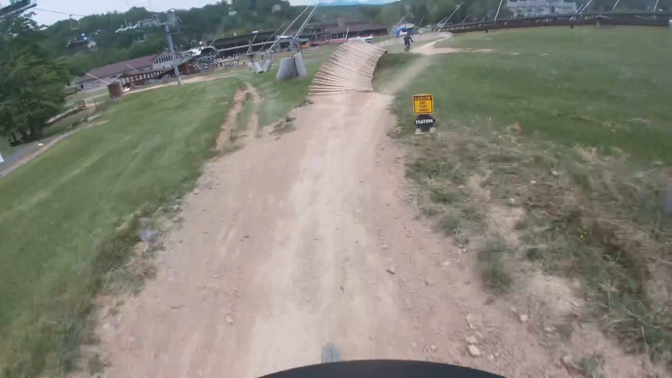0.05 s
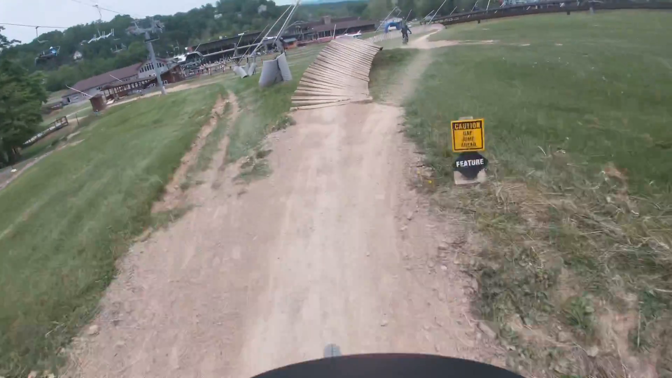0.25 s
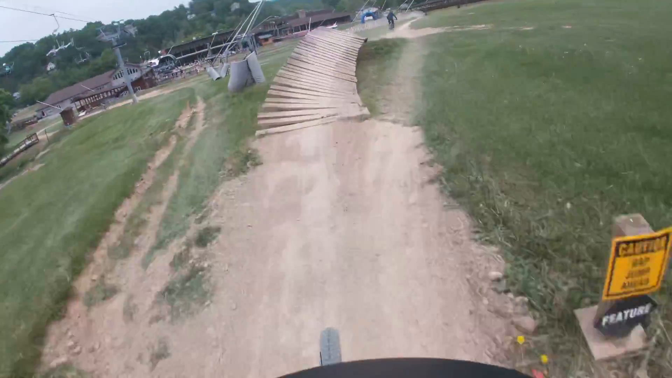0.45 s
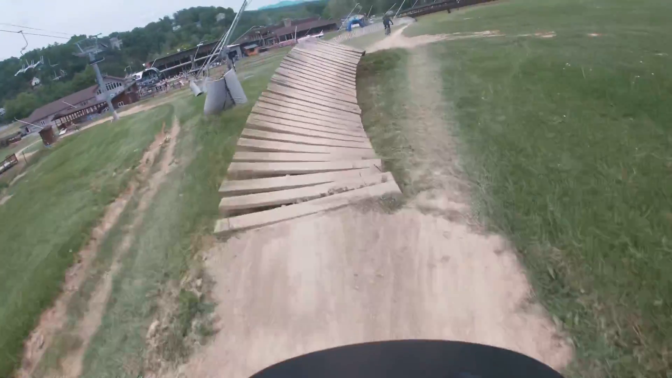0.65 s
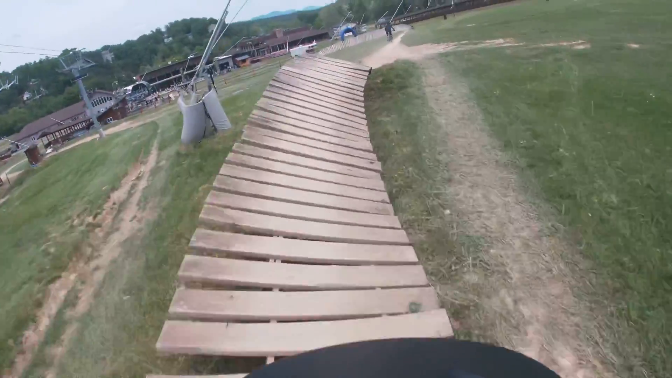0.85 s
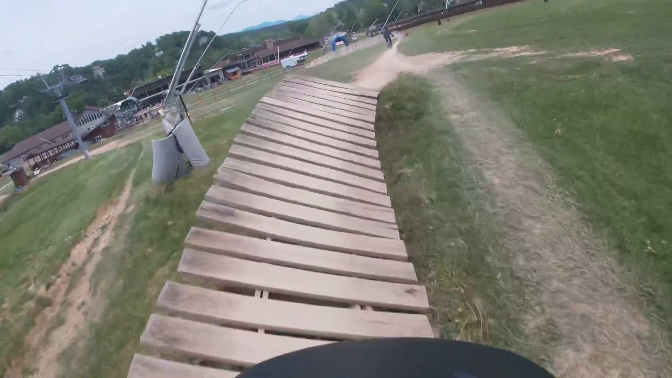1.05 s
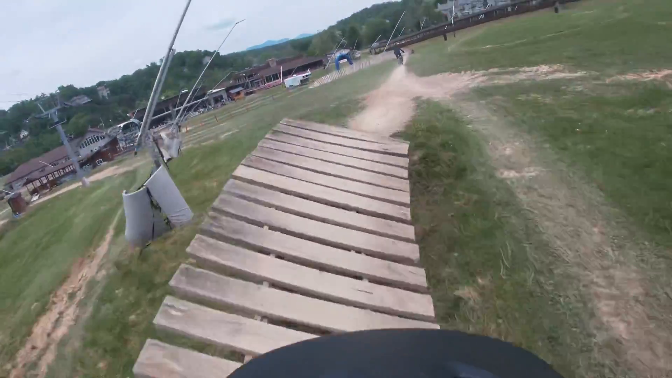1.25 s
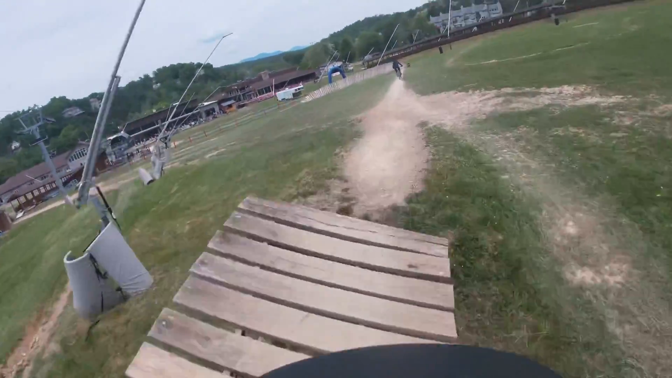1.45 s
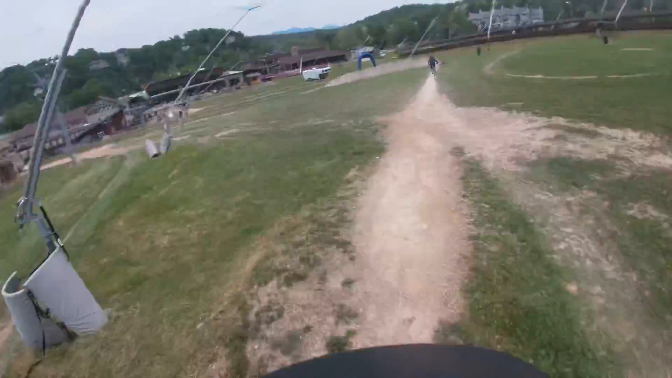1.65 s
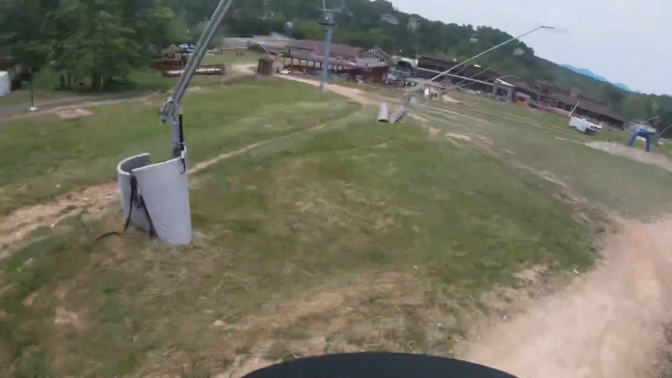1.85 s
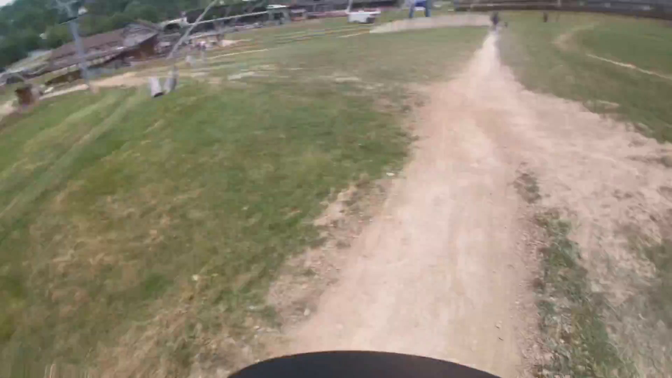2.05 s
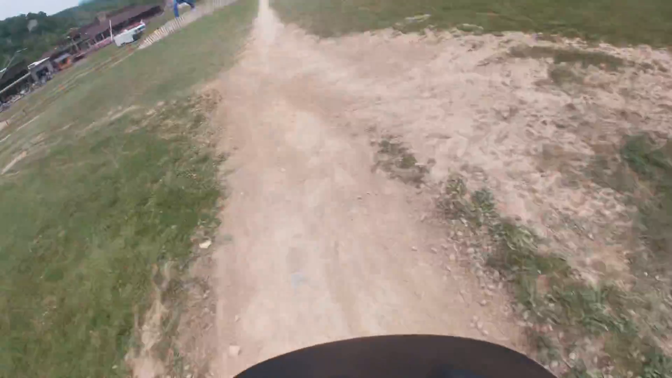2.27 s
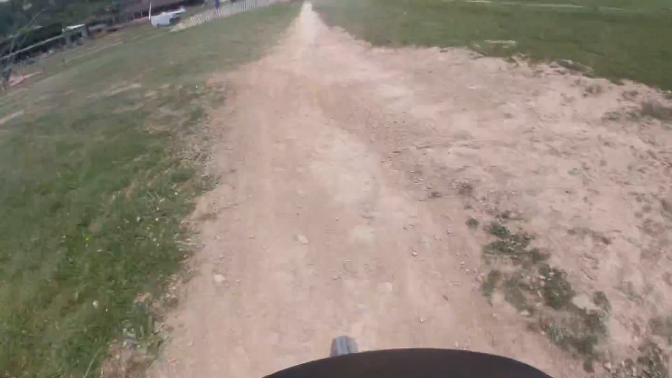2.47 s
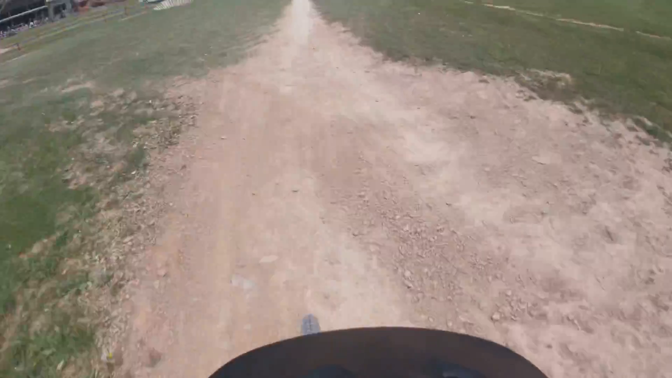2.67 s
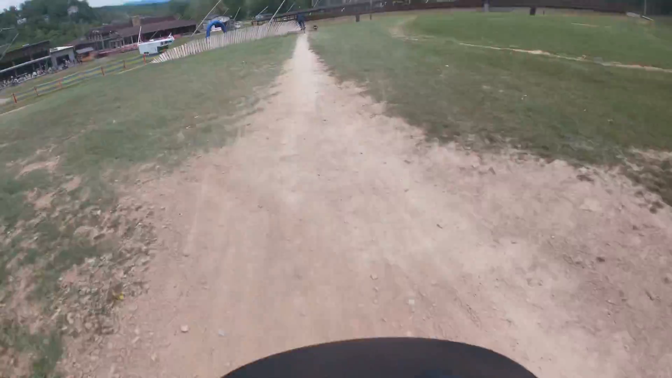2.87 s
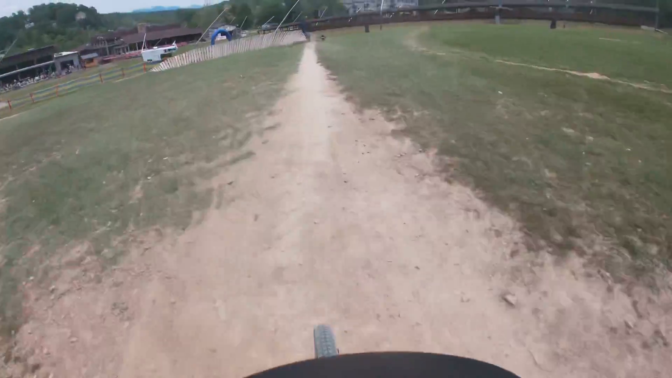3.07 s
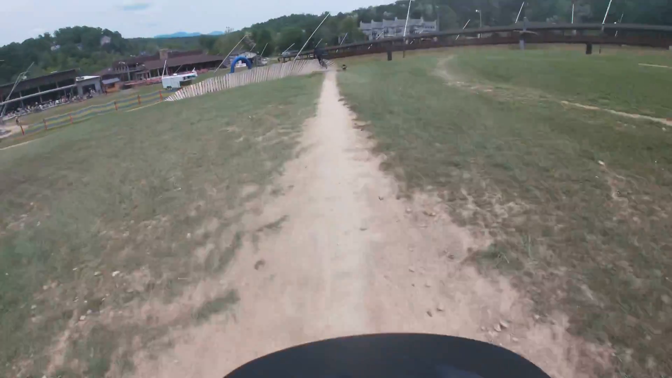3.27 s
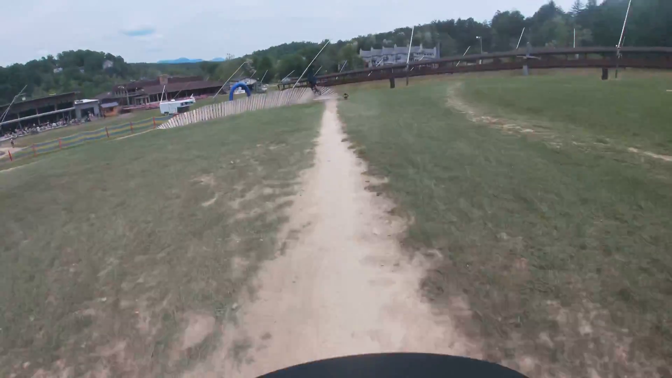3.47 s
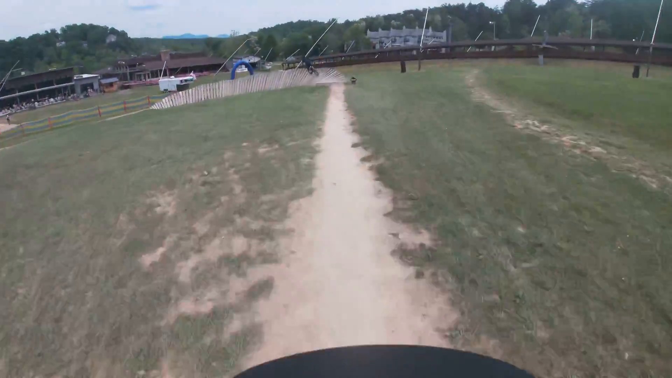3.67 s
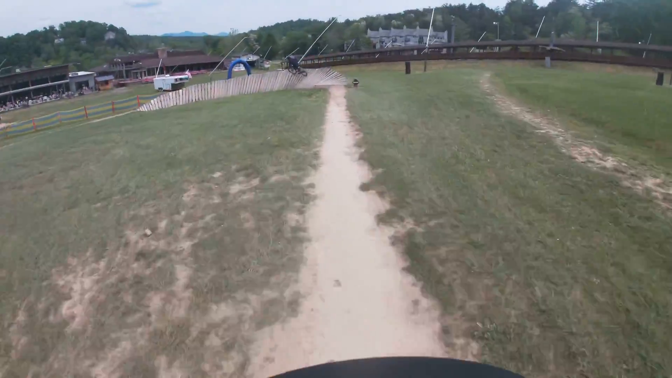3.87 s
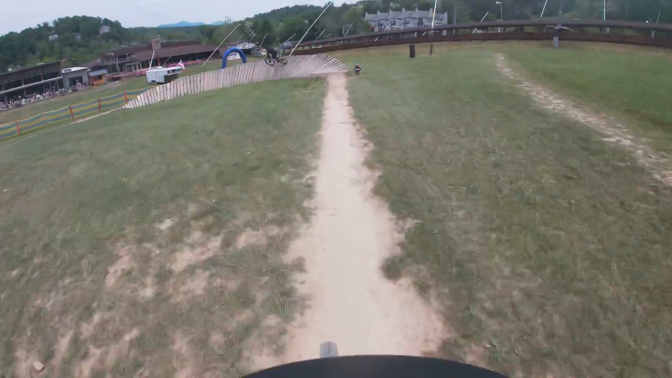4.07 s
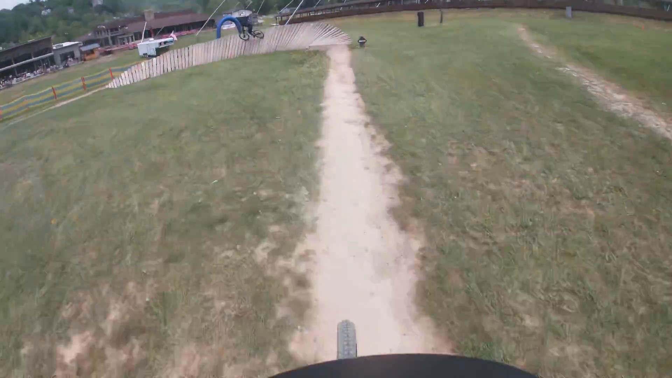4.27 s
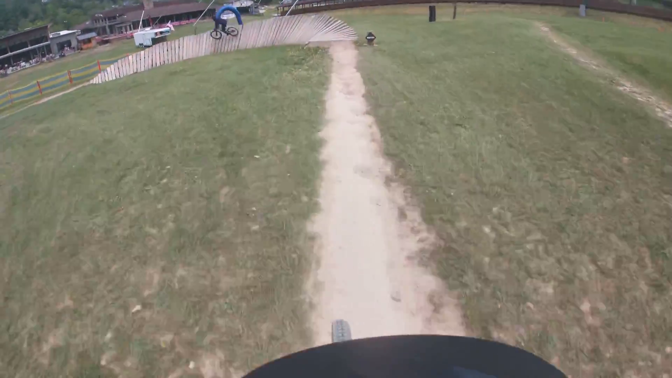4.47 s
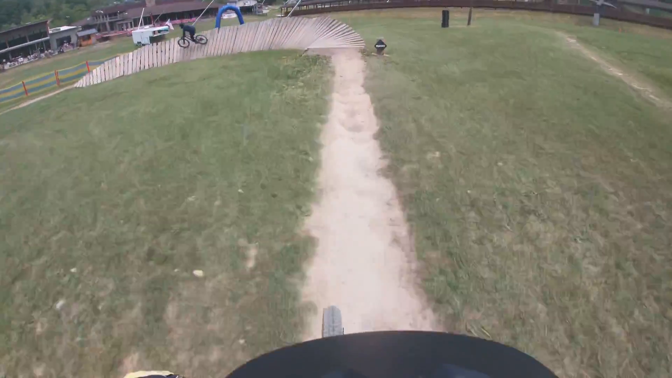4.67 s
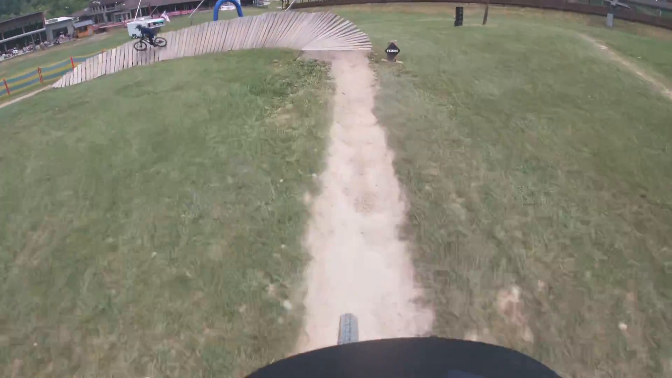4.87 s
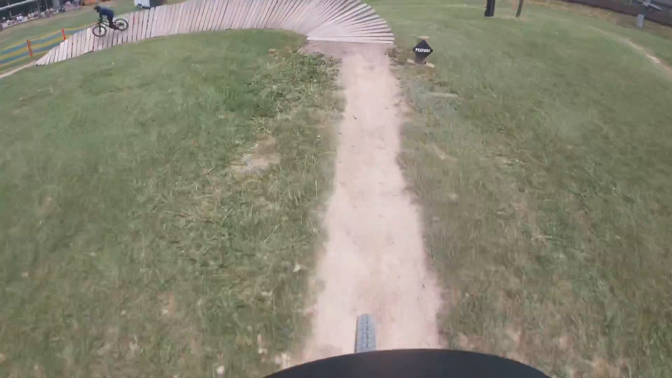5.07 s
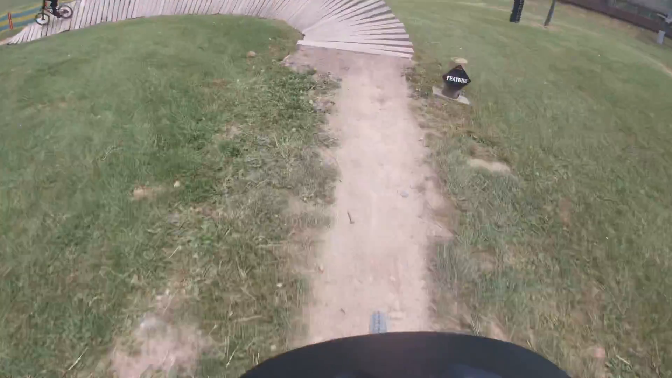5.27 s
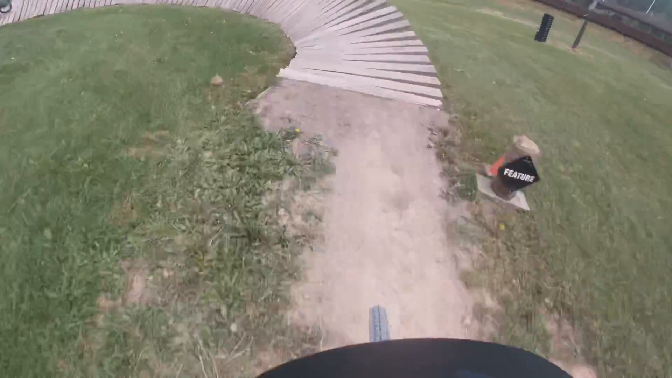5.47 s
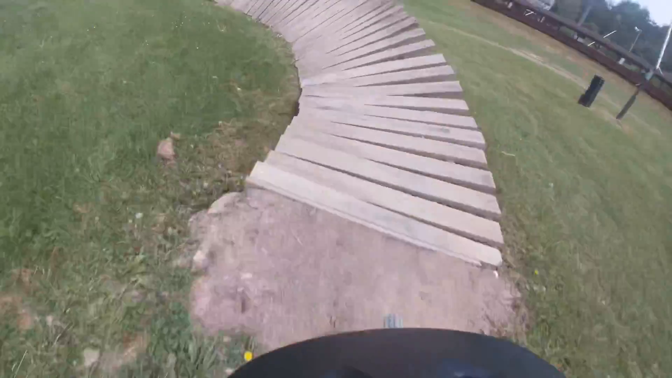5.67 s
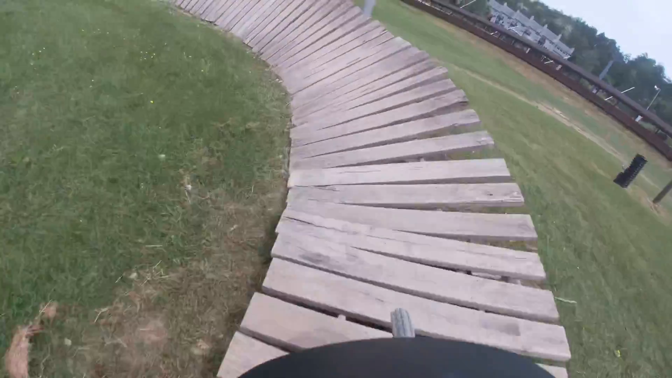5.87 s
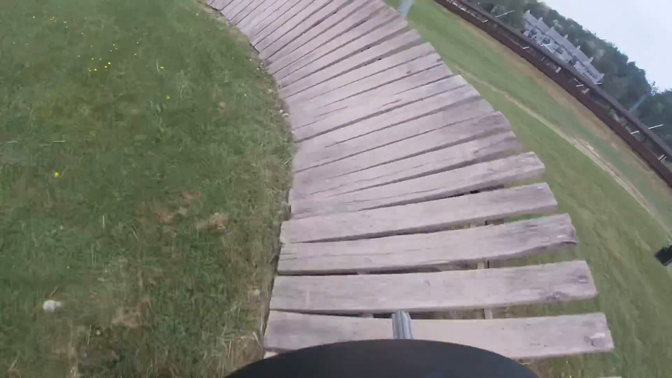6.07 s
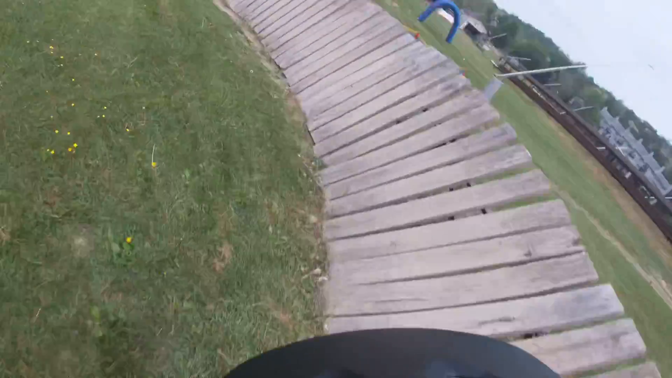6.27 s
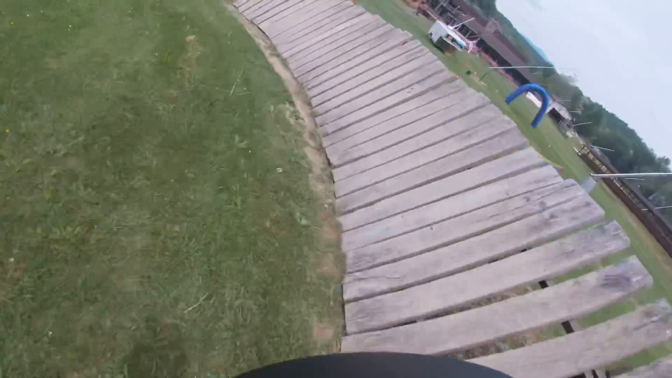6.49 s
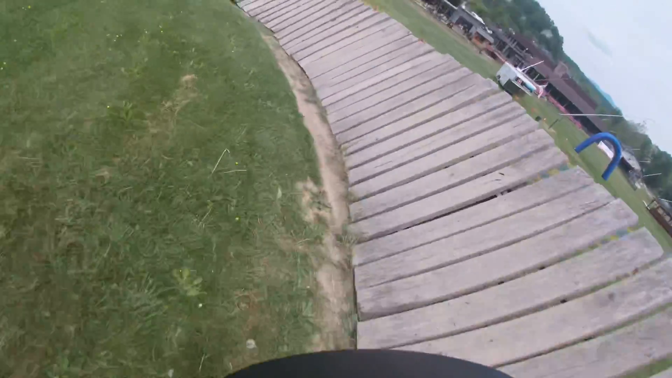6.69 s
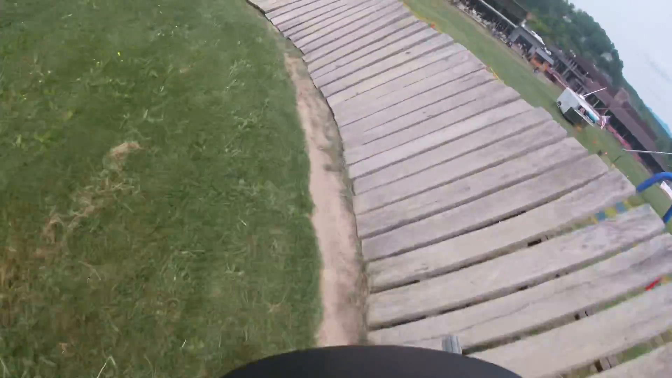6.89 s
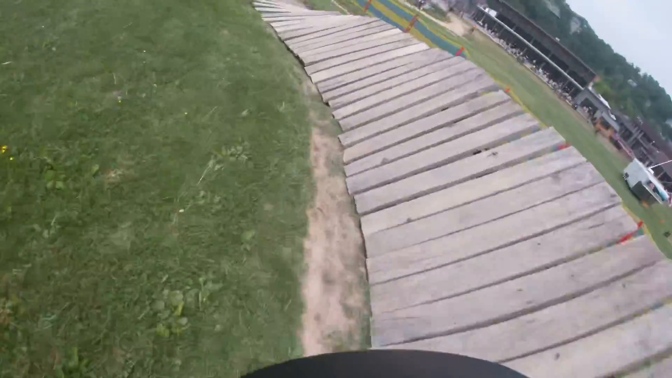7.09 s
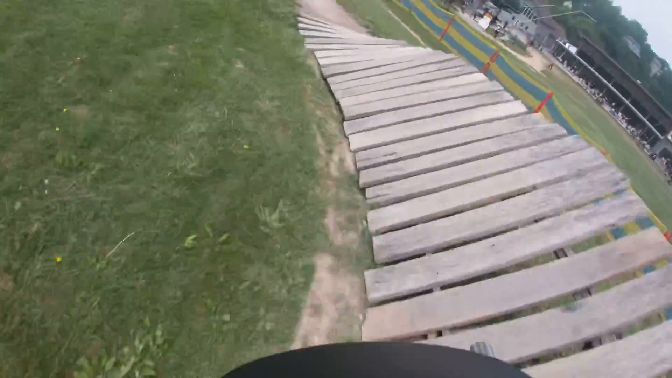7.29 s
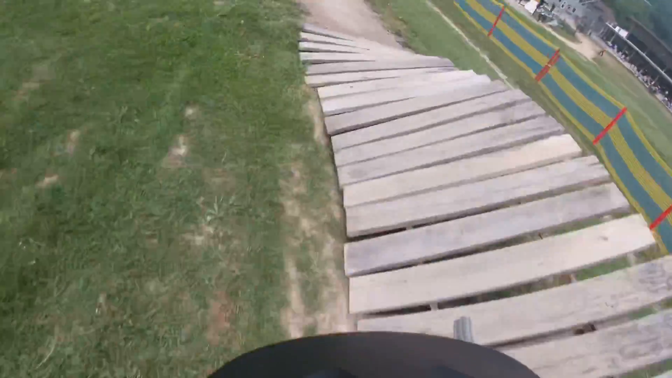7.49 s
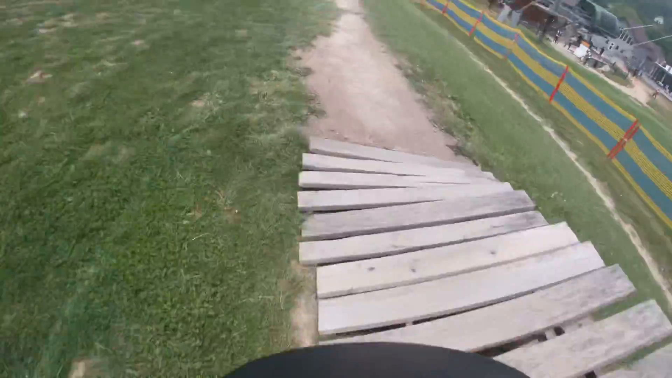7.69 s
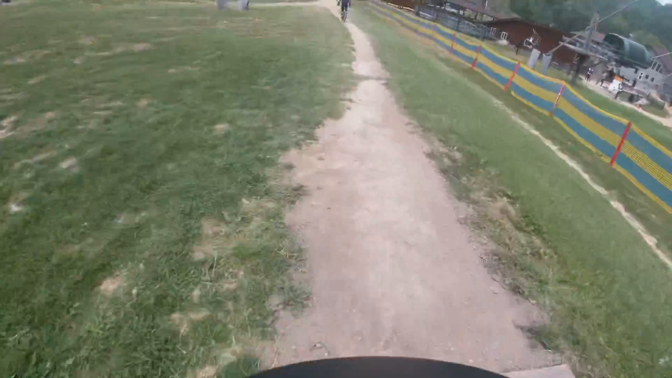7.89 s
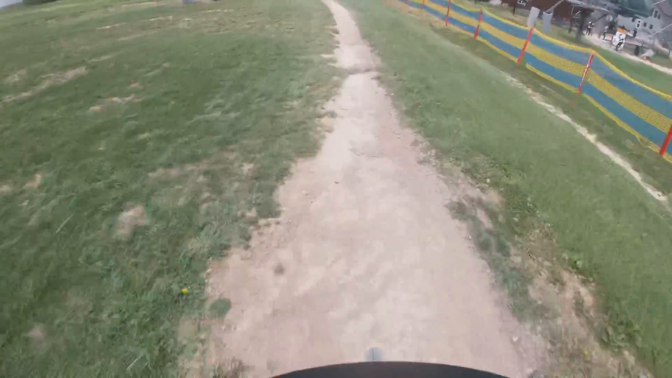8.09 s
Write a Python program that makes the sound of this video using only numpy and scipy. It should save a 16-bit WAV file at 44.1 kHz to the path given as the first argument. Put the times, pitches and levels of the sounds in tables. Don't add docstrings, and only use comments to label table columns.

```python
import sys
import numpy as np
from scipy import signal
from scipy.io import wavfile
from scipy.ndimage import uniform_filter1d

SR = 44100
rng = np.random.default_rng(int(sys.argv[2]) if len(sys.argv) > 2 else 0)


def int16_out(signal):
    q = np.round(np.clip(np.atleast_2d(signal).T, -1, 1) * 32767)
    wavfile.write(sys.argv[1], SR, q.astype(np.int16))


def natural_amplitude(level_db):
    exponent = np.asarray(level_db, float) / 20
    return 10 ** exponent


N = 358974

# mode_hz, width_hz, level_db
HOLLOW = [(264, 102, 2), (343.5, 95, -4), (441.5, 51, 0.5), (596, 216, -4)]
# mode_hz, width_hz, level_db
SHELL = [(829, 192, -4), (999, 335, -3.5), (1410, 233, 1.5), (1720, 210, 0), (1900, 187, -2.5),
         (2190, 93, -22)]
# mode_hz, width_hz, level_db
BRIGHT = [(2572, 360, -2), (2900, 630, -5), (3597, 310, -6.5)]


def rms_one(x):
    return x / np.sqrt(np.mean(x ** 2) + 1e-20)


def band_pass(x, order, edges_hz):
    return signal.sosfilt(signal.butter(order, edges_hz, "band", fs=SR, output="sos"), x)


def drift(rate):
    coarse = 40
    r = np.exp(-2 * np.pi * rate * coarse / SR)
    noise = rng.standard_normal(N // coarse + 2002)
    slow = signal.lfilter([1], [1, -2 * r, r * r], noise)[2000:]
    return np.interp(np.arange(N) / coarse, np.arange(len(slow)), rms_one(slow))


def resonate(x, hz, width_hz):
    r = np.exp(-np.pi * width_hz / SR)
    poles = [1, -2 * r * np.cos(2 * np.pi * hz / SR), r * r]
    return signal.lfilter([(1 - r * r) / 2, 0, (r * r - 1) / 2], poles, x)


def ring(clicks, hz, t60):
    r = 10 ** (-3 / (t60 * SR))
    w = 2 * np.pi * hz / SR
    return signal.lfilter([0, np.sin(w)], [1, -2 * r * np.cos(w), r * r], clicks + 1e-18)


def swell(clicks, hz, t60):
    return ring(ring(clicks, hz, t60), hz, t60) * 2 * np.e * np.log(1000) / (t60 * SR)


def strikes(times, db, spread_db):
    out = np.zeros(N)
    luck = rng.standard_normal((len(times), 2))
    heights = natural_amplitude(db + spread_db * luck[:, 0]) * np.sign(luck[:, 1])
    np.add.at(out, np.round(times * SR).astype(int), heights)
    return out


def air_stream():
    # time_s, speed_db (level of the rush), brightness_db
    stream = [(0.0, -40.5, 2), (0.2, -39, 5), (0.4, -39, 0), (0.86, -40, 1), (1.13, -37.5, 2),
              (1.63, -36, -0.5), (1.86, -35.5, 2.5), (2.3, -35, -0.5), (3.3, -37, 0.5), (3.9, -37, -1.5),
              (4.67, -42, 0.5), (5.3, -39.5, -2.5), (5.75, -38.5, -1.5), (6.2, -40.5, -3.5),
              (6.4, -37.5, 1.5), (6.85, -39.5, -1.5), (7.25, -39.5, -2.5), (8.14, -36, -3)]
    s, *columns = np.transpose(stream)
    return [np.interp(np.arange(N) / SR, s, column) for column in columns]


def ducking():
    # start_s, depth_db
    blows = [
        (2.365, -4.5),
        (2.44, -9),
        (5.93, -1),
        (7.369, -7),
    ]
    fall_s, recover_s = 0.066, 0.93
    t, gain_db = np.arange(N) / SR, 0
    for s, depth_db in blows:
        since = np.maximum(t - s, 0)
        gain_db = gain_db + depth_db * np.minimum(since / fall_s, 1) * np.exp(-since / recover_s)
    return gain_db


def gusts(band_hz):
    # top_s, level_db, pitch_hz, half_width_s
    presses = [(0.2, -29, 55, 0.047), (0.325, -14, 48.7, 0.031), (0.45, -35, 35, 0.072),
               (1.04, -21.5, 36.8, 0.19), (1.33, -41, 28, 0.036), (1.42, -26.5, 58, 0.086),
               (1.6, -21.5, 55, 0.028), (1.752, -23, 108, 0.047), (2.11, -26.5, 48.5, 0.098),
               (2.344, -9, 52, .035), (2.47, -12.5, 42, 0.043), (2.759, -31.5, 54, .05),
               (3.399, -33.5, 60, 0.11), (3.74, -22, 40, 0.092), (3.97, -22.5, 28, 0.068),
               (4.08, -25, 61, 0.02), (4.17, -23, 27, 0.03), (4.31, -13.5, 25.8, 0.043),
               (4.46, -11, 29.8, 0.089), (4.83, -26, 26.8, 0.022), (5.27, -16, 34, 0.062),
               (5.52, -27.5, 39, 0.063), (5.95, -13, 39.8, 0.053), (6.1, -27, 27, 0.12),
               (6.3, -20, 35.4, 0.059), (6.68, -17.5, 30.4, 0.21), (7.2, -24.5, 44.3, 0.03),
               (7.36, -20, 46.7, 0.088), (7.76, -16, 33.3, 0.096), (7.941, -19, 25.8, .05)]
    reach_db_per_oct, rise_share = -19, 0.64
    t = np.arange(0, N, 40) / SR
    s, db, hz, half_s = np.transpose(presses)[:, :, None]
    top = natural_amplitude(db + reach_db_per_oct * np.abs(np.log2(hz / band_hz)))
    width_s = half_s * np.where(t < s, rise_share, 1)
    bells = top * np.exp(-.5 * ((t - s) / width_s) ** 2)
    return np.interp(np.arange(N) / SR, t, np.sum(bells, axis=0))


def buffet():
    # level_db (at mean speed), speed_share (of the swing in dB), slow_lumps_db
    steady_bands = [
        (-34, 0.3, 5),
        (-36, 0.47, 3.0),
        (-41, 0.91, 2.5),
    ]
    bands_hz = ((14.76, 35), (42, 73.5), (91.3, 192.4))
    speed_db = air_stream()[0] + ducking()
    out = 0
    for (db, share, slow_db), edges_hz, lumpy_db in zip(steady_bands, bands_hz, (.6, .6, 1.5)):
        eddies = band_pass(rng.standard_normal(N + SR), 3, edges_hz)[SR:]
        slow = uniform_filter1d(uniform_filter1d(eddies ** 2, size=3000), size=3000)
        lumps = eddies / slow ** 0.28 * natural_amplitude(lumpy_db * drift(17))
        steady = natural_amplitude(db + share * (speed_db - speed_db.mean()) + slow_db * drift(6.2))
        level = steady + gusts(np.sqrt(np.prod(edges_hz)))
        out = out + level * rms_one(lumps)
    return out


def flurries():
    # start_s, length_s, lift_db
    shakes = [(0.183, 0.034, 3), (1.63, 0.11, 2.5), (1.736, 0.076, 4.5), (1.963, 0.028, 3),
              (2.691, 0.0063, 12.5), (5.286, .012, 1), (6.314, 0.027, 8.5), (6.427, 0.037, 3.5),
              (6.707, 0.03, 5), (6.796, 0.097, 3.5), (6.965, 0.078, 6.5), (7.108, 0.07, 5.5),
              (7.351, 0.0094, 9), (7.997, 0.022, 1)]
    t, lift = np.arange(N) / SR, np.zeros(N)
    for s, length_s, lift_db in shakes:
        during = (t > s) & (t < s + length_s)
        lift += lift_db * during * (1 - 0.27 * (t - s) / length_s)
    return uniform_filter1d(lift, size=130)


def rush():
    # level_db (against the rush), brightness_share
    family_levels = [
        (0.5, 0.0),
        (-9.5, 0.1),
        (-11.5, 1.12),
        (-21.5, 1.5),
    ]
    # mode_hz, width_hz, level_db
    airy = [(4505, 100, 0), (4786, 140, -4), (5440, 550, -5), (5790, 260, -9.5), (7360, 2400, -23.5),
            (8850, 1600, -24.5), (10800, 2000, -31), (12400, 1000, -15)]
    together = drift(7.5)
    grains = rng.random(N) < 900 / SR
    grain_db = 1.1 * np.minimum(rng.exponential(1, N), 5)
    grit = rms_one(grains * natural_amplitude(grain_db) * rng.choice([-1, 1], N))
    speed_db, bright_db = air_stream()
    lift_db = flurries()
    lift_shares = (1, 1, 0.48, 0.48)
    out = 0
    for (family_db, share), modes, lift_share in zip(family_levels, (SHELL, HOLLOW, BRIGHT, airy), lift_shares):
        level_db = speed_db + family_db + share * bright_db + lift_share * lift_db
        band = 0
        for hz, width_hz, db in modes:
            flicker = natural_amplitude(1.13 * together + 1.47 * drift(47))
            air = (rng.standard_normal(N) + 0.47 * grit) * flicker
            wide = 1.354 * width_hz
            band = band + natural_amplitude(db) * resonate(resonate(air, hz, wide), hz, wide)
        out = out + natural_amplitude(level_db) * rms_one(band)
    return out * natural_amplitude(ducking())


def ticks():
    # time_s, peak_db, top_part_db
    grit_touches = [(0.2957, -35, -61), (1.5474, -26.5, -55.5), (1.56, -42, -71), (1.574, -46, -71),
                    (1.659, -32.5, -61), (1.7, -36, -75), (2.0717, -37, -72), (2.3565, -30, -60),
                    (2.5037, -60, -87), (2.595, -60, -86), (2.701, -40, -71), (2.7176, -48, -103),
                    (2.856, -56, -94), (2.942, -41, -76), (3.994, -47, -72), (5.287, -52, -59.5),
                    (5.931, -47, -70), (6.0437, -52, -80), (7.0354, -45, -83), (7.4776, -44, -68),
                    (7.528, -65, -79), (7.8298, -36.5, -70), (7.95, -38.5, -72)]
    s, level_db, top_db = np.transpose(grit_touches)
    parts = ((level_db - 4, (3000, 5900), .0011), (top_db + 1.0, (6800, 13500), .001))
    out = 0
    for db, edges_hz, puff_s in parts:
        fade = np.exp(-1 / (puff_s * SR))
        touch = np.abs(strikes(s - puff_s / 2, db, spread_db=0)) + 1e-18
        puff = signal.lfilter([np.e * (1 - fade)], [1, -2 * fade, fade ** 2], touch)
        noise = band_pass(rng.standard_normal(N), 4, edges_hz)
        out = out + puff * rms_one(noise)
    return out


def buckle():
    # time_s, peak_db, upper_modes_db
    metal_touches = [(0.2116, -48, -71), (0.221, -53, -71), (0.299, -46, -66), (0.3774, -50, -77),
                     (0.4744, -60, -71), (0.8752, -47, -67.5), (1.0116, -80, -78), (1.3492, -53, -68.5),
                     (4.383, -46, -79), (4.4672, -47.5, -73), (4.6326, -46, -73), (4.6976, -76, -93),
                     (5.285, -44.5, -56.5), (5.3713, -36.5, -63.5), (5.9613, -48.5, -77),
                     (6.1914, -51, -80), (6.4874, -43.5, -73.5), (6.6247, -64, -80), (7.5648, -39, -65),
                     (8.094, -44, -77)]
    # mode_hz, level_db, t60_s
    main_modes = [(4150, -20, 0.092), (5530, 0.5, 0.042), (7120, -17, 0.035), (7100, -29.5, 0.021)]
    # mode_hz, level_db, t60_s
    upper_modes = [(8900, -1, 0.047), (10390, -2, 0.019), (11600, -8, .015), (12200, -4.5, .015),
                   (13100, -0.5, .018), (13600, -5, .015), (7800, 0, .02), (9500, -4.5, .012)]
    s, low_db, top_db = np.transpose(metal_touches)
    # modes, level, spread and chatter in dB
    groups = ((main_modes, low_db, 1.1, -8), (upper_modes, top_db - 0.5, 4.0, 1.5))
    chatter = ((.0015, -8.5), (.0045, -15.5), (.009, -5.5), (.015, -22.5))
    out = 0
    for modes, level_db, spread_db, chatter_db in groups:
        for hz, db, t60 in modes:
            touches = strikes(s, level_db + db, spread_db)
            for later_s, softer_db in chatter:
                again_s = s + later_s * rng.uniform(0.28, 2.1, len(s))
                touches += strikes(again_s, level_db + db + softer_db + chatter_db, spread_db)
            out = out + band_pass(ring(touches, hz, t60), 2, [hz * 0.77, hz * 1.15])
    return out


def jolts():
    # time_s, hollow_ring_db, swing_db
    bumps = [(0.298, -26, -9.5), (1.55, -22.5, -28), (1.56, -51, -15), (1.703, -31, -35),
             (1.741, -26, -17.5), (2.075, -47, -24), (2.29, -36, -30), (2.317, -30.5, -15.5),
             (2.345, -21, -10.5), (2.369, -23, -17), (2.43, -35, -30), (2.449, -48, -17.5),
             (2.463, -37, -23), (2.701, -31, -29), (2.94, -47, -19), (5.911, -29, -20.5),
             (5.963, -22.5, -31), (6.203, -39, -30), (6.252, -20.5, -17.5), (7.116, -46, -31),
             (7.135, -30, -39), (7.27, -21.5, -30), (7.291, -36, -22), (7.335, -52, -15), (7.362, -31, -22),
             (7.818, -28.5, -19), (7.913, -38, -35)]
    # mode_hz, level_db, t60_s
    swing_modes = [(52, -5, 0.18), (110.2, -4, .05), (145.4, -2.5, 0.051)]
    s, hollow_db, thump_db = np.transpose(bumps)
    hollow_ring = 0
    for hz, _, db in HOLLOW[2:]:
        hollow_ring = hollow_ring + swell(strikes(s, hollow_db + db - 7.5, spread_db=1.7), hz, 0.018)
    push = np.zeros(N)
    push[np.round((s + .002) * SR).astype(int)] = natural_amplitude(thump_db + 3)
    swing = sum(natural_amplitude(db) * ring(push, hz, t60) for hz, db, t60 in swing_modes)
    return hollow_ring + signal.sosfilt(signal.butter(3, 220, fs=SR, output="sos"), swing)


def knocks():
    # time_s, peak_db, centre_hz
    contacts = [(0.295, -12.5, 1620), (1.55, -5, 2050), (1.561, -15.5, 1940), (1.663, -23, 1500),
                (1.704, -15.5, 1590), (1.741, -25.5, 1430), (2.076, -31, 1740), (2.318, -15.5, 1413),
                (2.345, -15, 950), (2.36, -8.5, 1880), (2.37, -15.5, 1800), (2.432, -22.5, 1840),
                (2.438, -23, 829), (2.463, -12, 1410), (2.7, -14, 1900), (2.942, -10.5, 1900),
                (4.63, -33, 1720), (5.911, -11, 1720), (5.913, -14, 1010), (5.963, -23.5, 1410),
                (6.203, -24.5, 1600), (6.252, -18, 903), (7.27, -24, 1010), (7.291, -24, 1030),
                (7.363, -8, 1490), (7.708, -20.5, 1410), (7.817, -21, 1460), (7.828, -20, 1330),
                (7.841, -23.5, 1470), (7.913, -9.5, 1500)]
    s, shell_db, centre_hz = np.transpose(contacts)
    bright_db = shell_db - 27 + 16 * np.log2(centre_hz / 1500)
    out = 0
    for k, (hz, _, db) in enumerate(SHELL):
        reach_db = -13 * np.abs(np.log2(hz / centre_hz))
        clicks = np.abs(strikes(s - .0013, shell_db + reach_db + 0.6 * db - 5.5, spread_db=3.14))
        out = out + (-1) ** k * swell(clicks, hz, 0.0095)
    for hz, _, _ in BRIGHT:
        reach_db = -6 * np.abs(np.log2(hz / (2 * centre_hz)))
        out = out + swell(strikes(s, bright_db + reach_db - 3.5, spread_db=4.0), hz, 0.0018)
    return out


def scene():
    wall = signal.butter(3, 6900, fs=SR, output="sos")
    wind = buffet() + signal.sosfilt(wall, rush())
    return (wind + ticks() + buckle() + jolts() + knocks())[None]


def low_pass(x):
    return signal.sosfilt(signal.butter(12, 14800, fs=SR, output="sos"), x)


def record(dry):
    hiss = natural_amplitude(-102) * rng.standard_normal(dry.shape)
    mix = 1.149 * np.tanh(dry / 1.272) + hiss
    return low_pass(mix)


dry = scene()
out = record(dry)
int16_out(out)
```